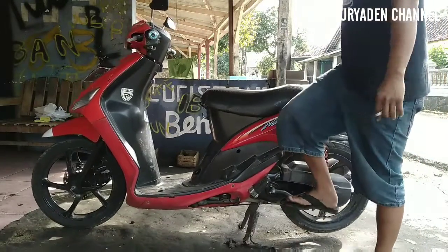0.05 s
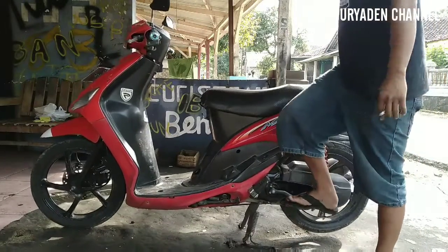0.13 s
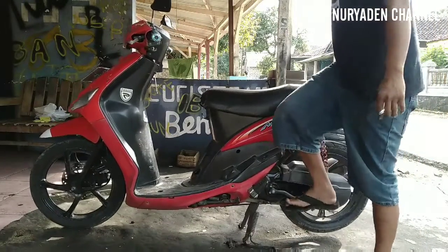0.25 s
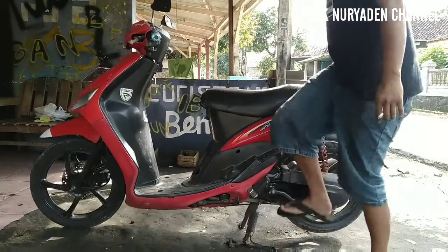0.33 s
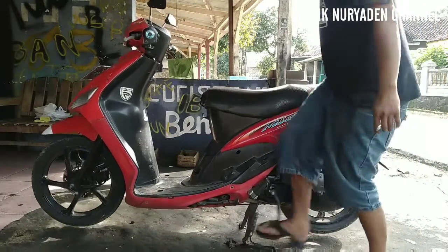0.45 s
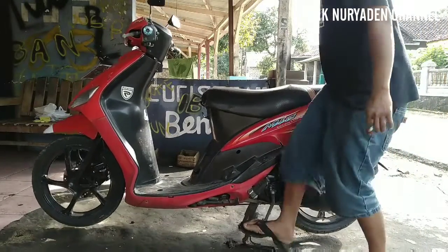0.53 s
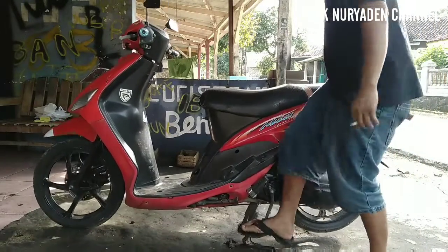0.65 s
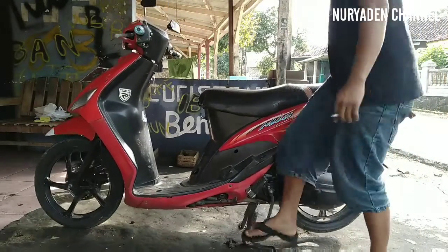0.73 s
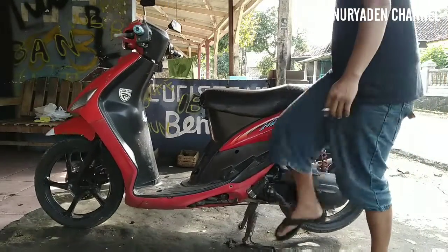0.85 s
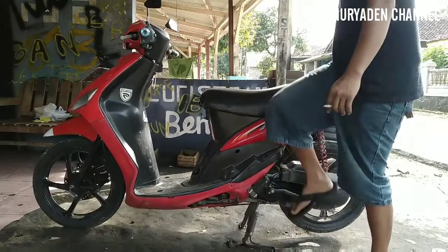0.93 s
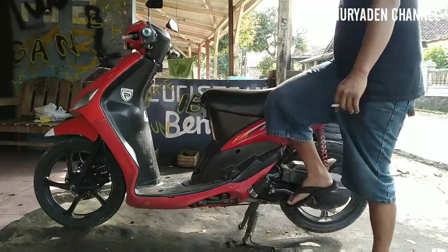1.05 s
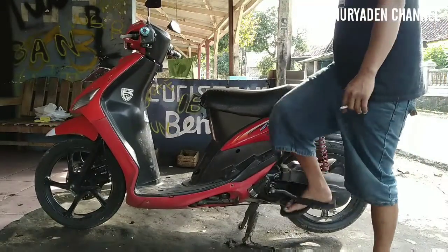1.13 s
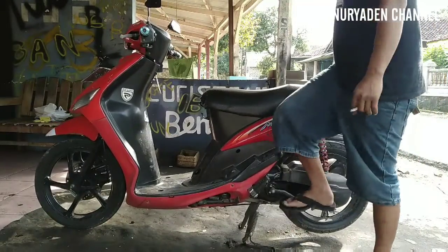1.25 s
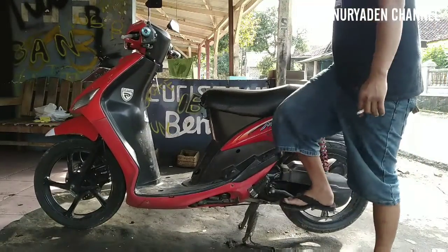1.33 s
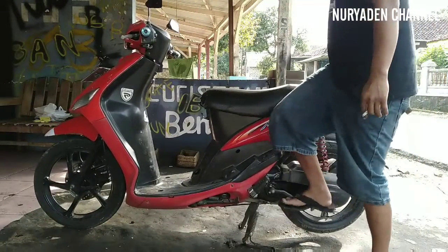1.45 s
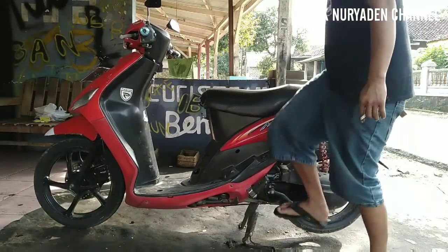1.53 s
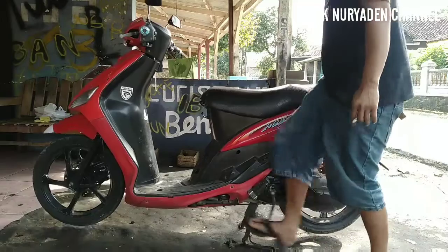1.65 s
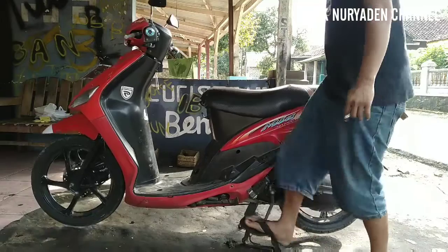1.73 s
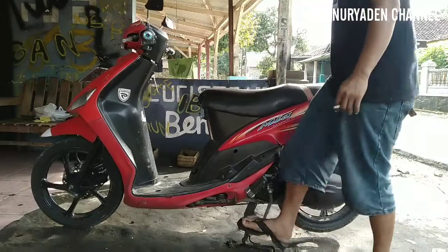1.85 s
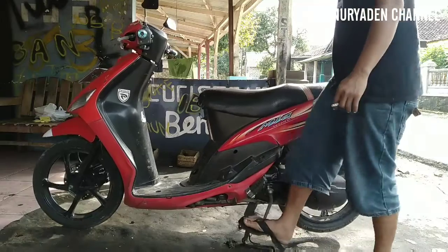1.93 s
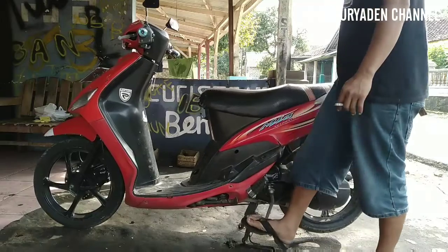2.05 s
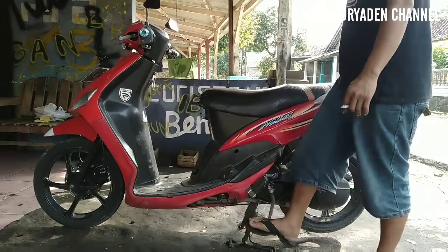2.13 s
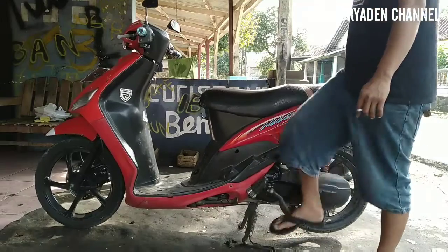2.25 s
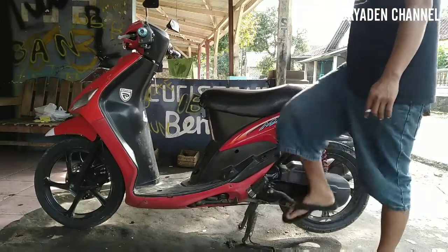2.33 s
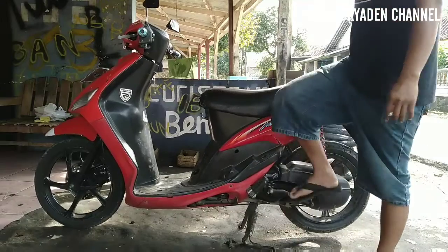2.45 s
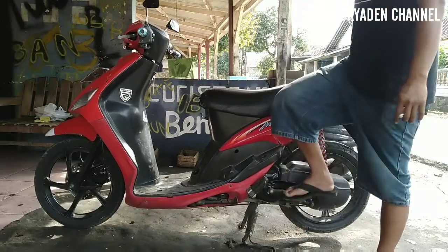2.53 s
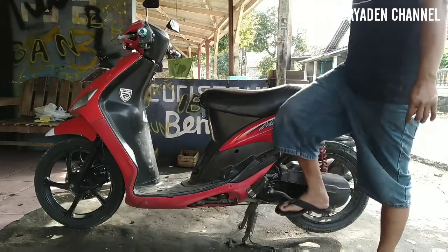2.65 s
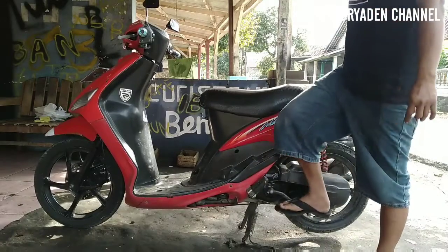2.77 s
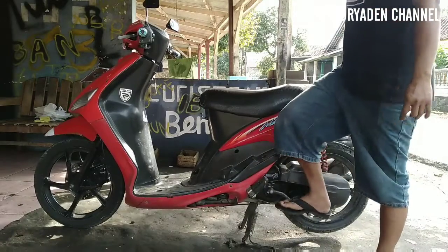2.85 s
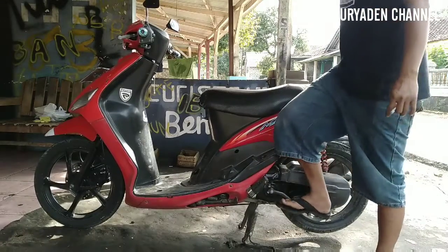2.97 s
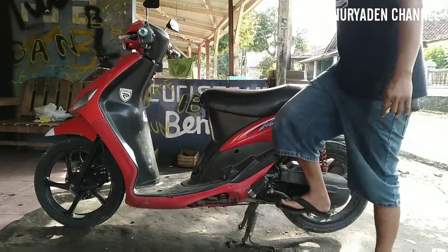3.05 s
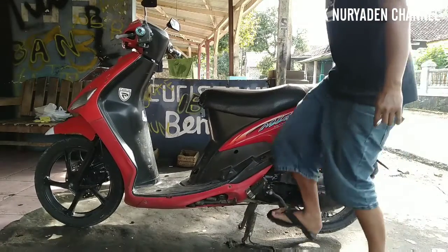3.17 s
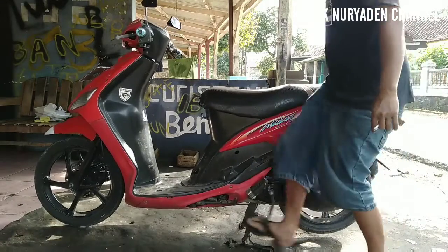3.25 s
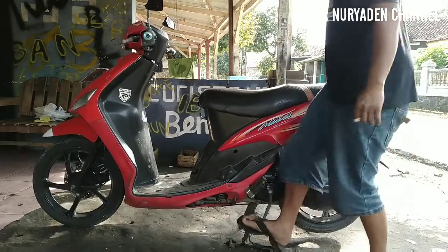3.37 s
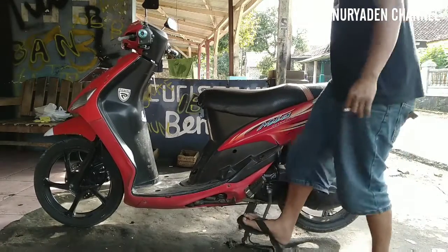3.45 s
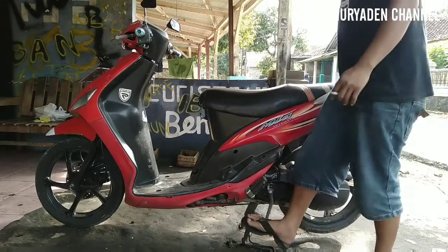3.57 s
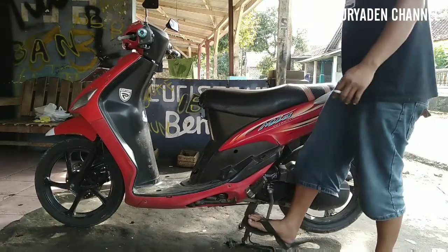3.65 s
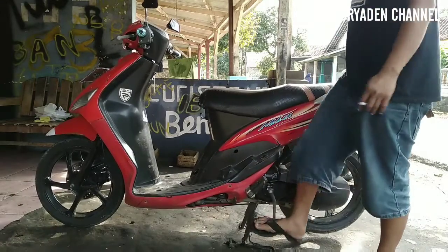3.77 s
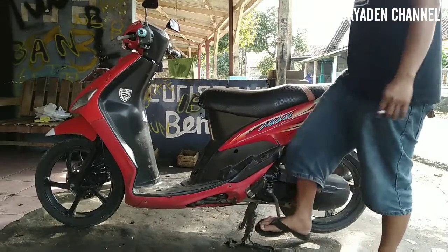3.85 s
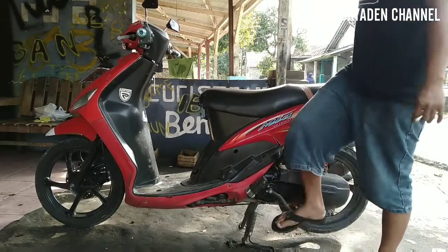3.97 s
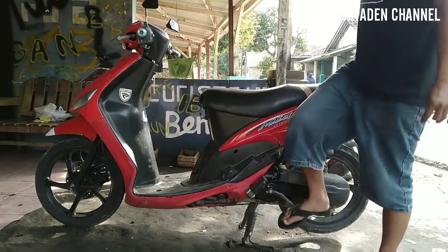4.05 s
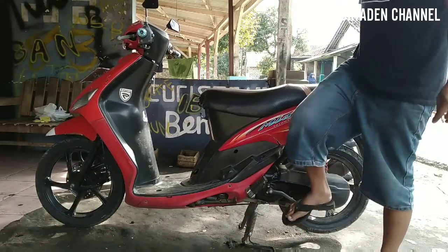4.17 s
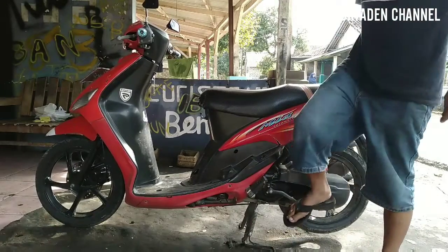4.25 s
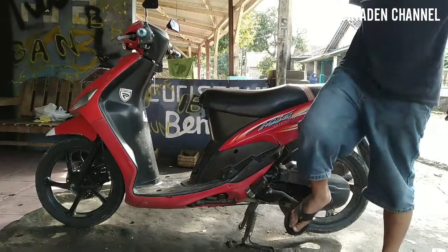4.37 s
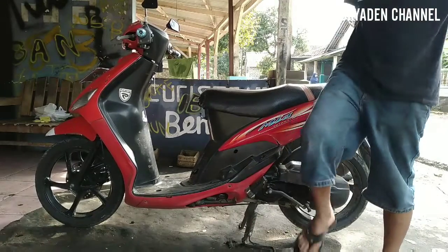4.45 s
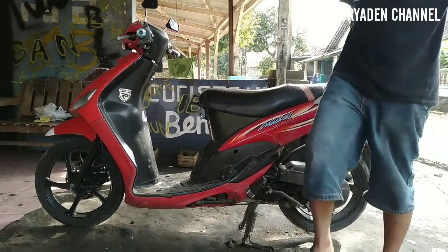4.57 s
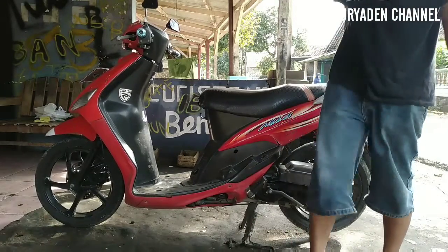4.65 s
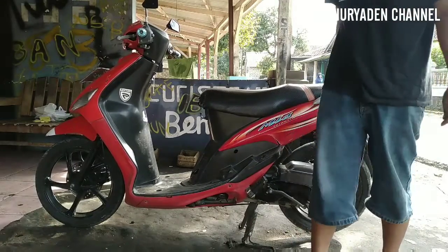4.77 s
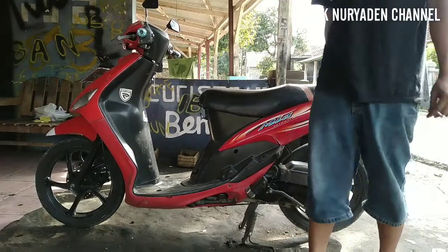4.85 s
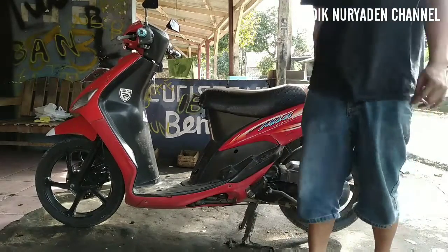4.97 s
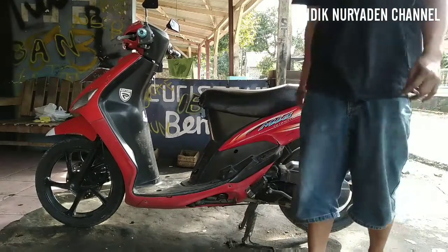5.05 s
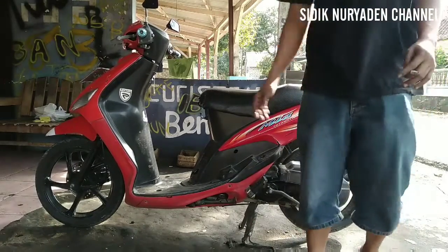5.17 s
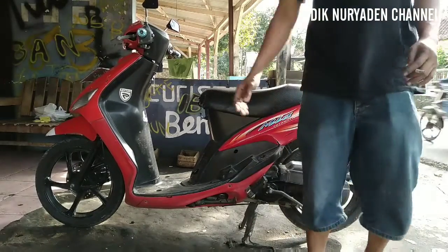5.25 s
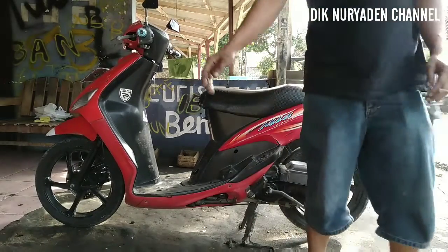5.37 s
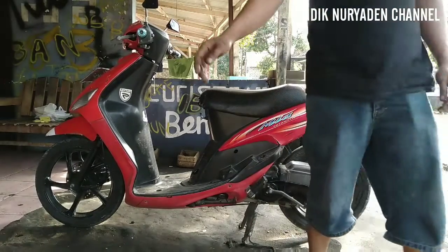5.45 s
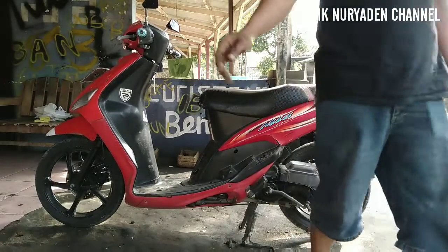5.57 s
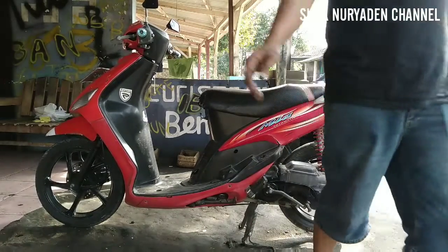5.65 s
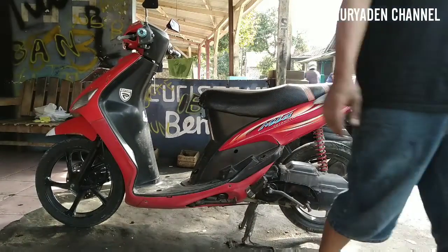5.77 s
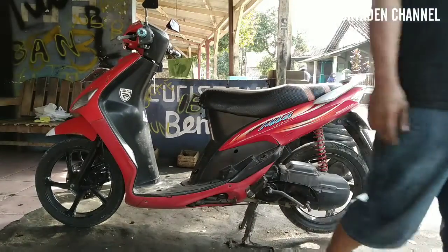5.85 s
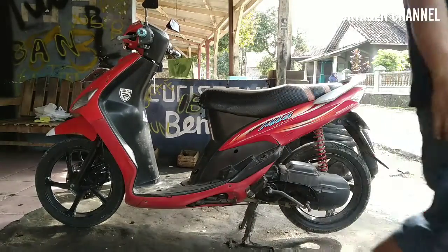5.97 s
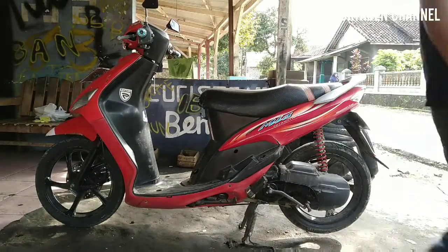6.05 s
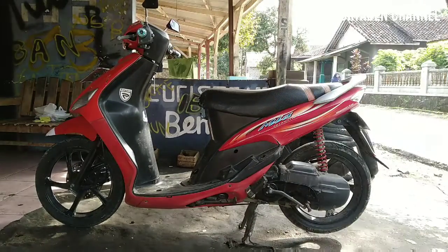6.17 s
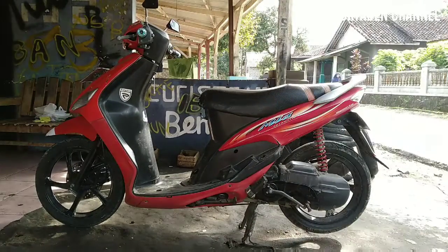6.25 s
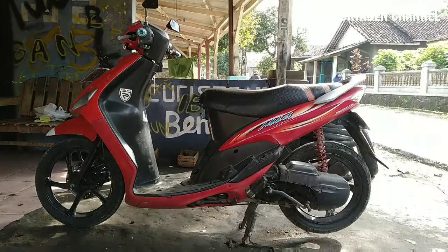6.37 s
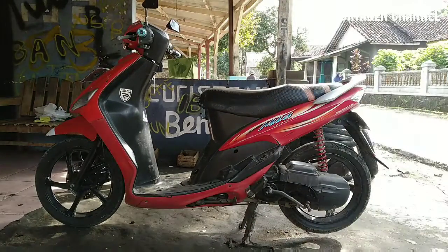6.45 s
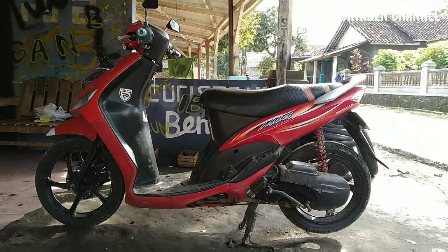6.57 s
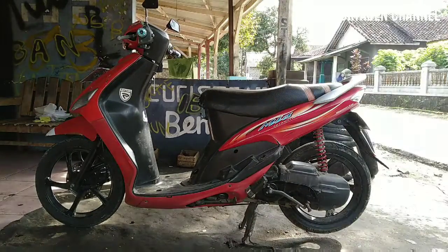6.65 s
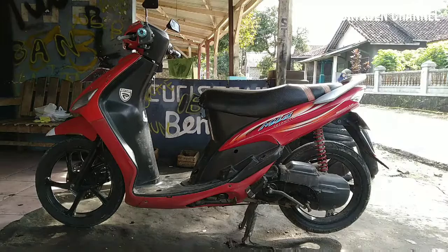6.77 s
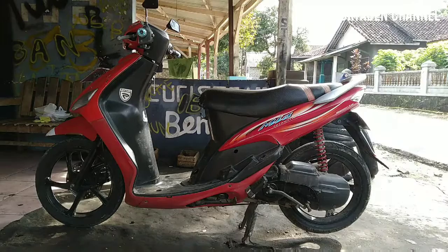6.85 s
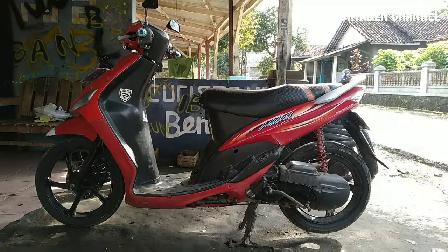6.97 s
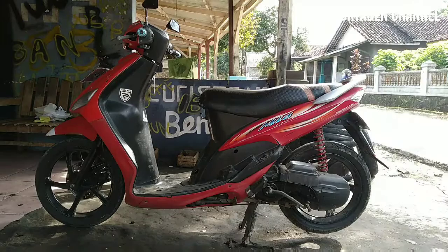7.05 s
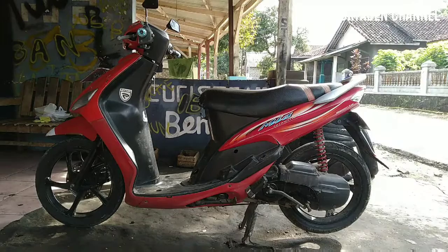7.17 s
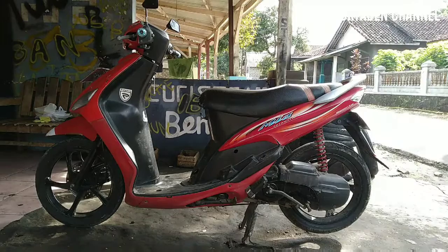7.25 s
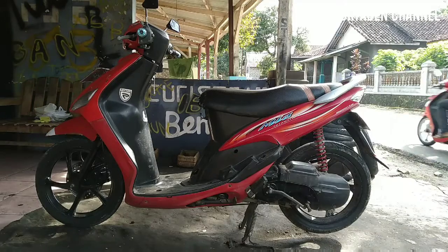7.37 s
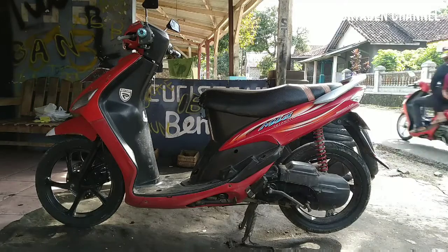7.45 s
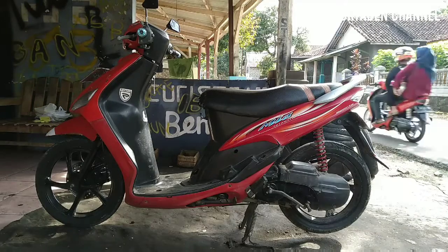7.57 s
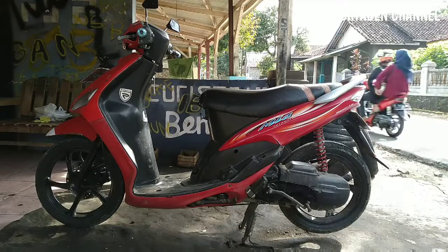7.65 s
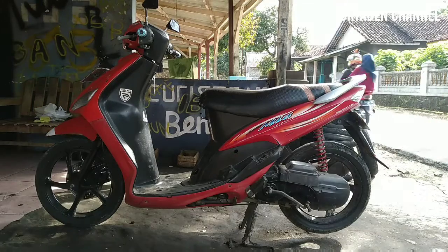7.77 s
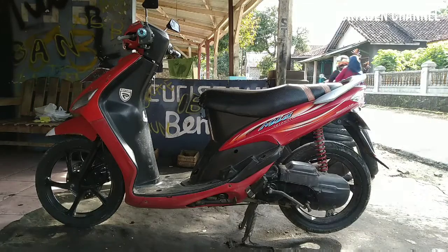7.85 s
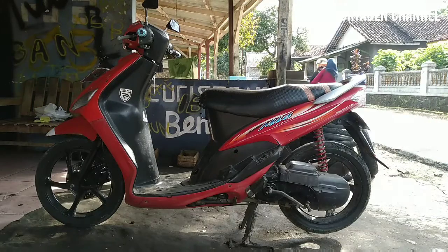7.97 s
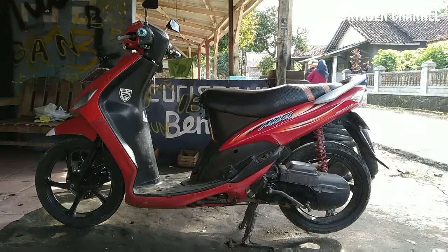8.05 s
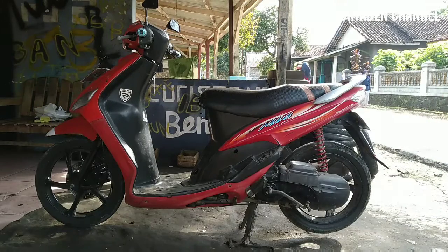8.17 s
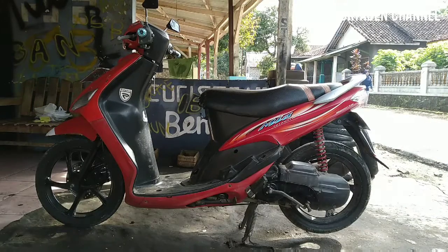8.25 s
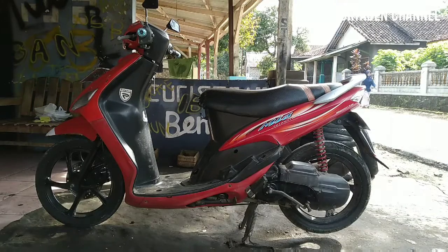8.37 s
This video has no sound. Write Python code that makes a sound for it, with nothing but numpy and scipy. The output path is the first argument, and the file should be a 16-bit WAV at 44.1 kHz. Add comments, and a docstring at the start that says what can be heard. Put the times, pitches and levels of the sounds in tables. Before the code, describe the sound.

Close, dry metallic clacks lead: a kick lever hits its stop three times, with crank scraping, loose teeth rattling on the return and a brief roof ring. Behind is a soft bed of distant traffic and leaves and a departing bike. Afterwards two small motorbikes swell past in turn, with tyre roar and hiss, while wind thumps a stereo phone microphone.

```python
"""On the road behind a workshop yard one motorbike leaves; under the roof a scooter's kick-starter is stamped down
at about 0.5, 1.7 and 3.3 s: the crank whirrs, the lever clacks on its stop and springs back over loose gear teeth.
Two single-cylinder bikes then pass near 4.8 and 7 s, built from tones locked to their firing plus shaped noise.
From 4.8 s on, stronger gusts buffet a phone's two microphone ports, each with its own treble resonance."""
import sys
import numpy as np
from scipy import signal
from scipy.fft import rfft, irfft, next_fast_len
from scipy.io import wavfile
from scipy.ndimage import uniform_filter1d, map_coordinates

SR = 44100
rng = np.random.default_rng(int(sys.argv[2]) if len(sys.argv) > 2 else 0)


def wav_record(signal):
    """Record a signal, one row per channel, as 16-bit PCM in the file named by sys.argv[1]."""
    frames = np.transpose(np.atleast_2d(signal))
    bounded = np.clip(frames, -1, 1)
    # unit amplitude maps onto the largest positive 16-bit level
    quanta = np.round(bounded * 32767).astype(np.int16)
    wavfile.write(sys.argv[1], SR, quanta)


N = 370515

# Far traffic and leaves: spectrum. Each row: frequency in Hz, relative density in dB per Hz.
YARD_SPECTRUM = [(15, -40), (25, 0), (60, -5.5), (140, -1.5), (250, -11), (460, -24), (700, -31.5),
                 (1290, -36.5), (5400, -33.5), (7300, -37.5), (8800, -37), (10700, -42), (16000, -55)]
# Width of the yard bed. Each row: frequency in Hz, left-right likeness from 0 to 1.
YARD_LIKENESS = [(60, 0.9), (130, 1), (300, 1), (640, 1), (1400, 0.56), (3000, 0), (15000, 0)]

# Exhaust loudness of each bike. Each row: time in seconds, level in dB.
LEAVING_LEVEL = [(0, -41.5), (.55, -42.5), (.75, -44.5), (1.3, -52), (1.7, -54), (2.5, -82)]
FIRST_LEVEL = [(0, -65), (.7, -68), (1.2, -54), (1.8, -49), (3.2, -49.5), (3.6, -41), (4.2, -38),
               (4.5, -32.5), (4.8, -35), (5.7, -35), (6.3, -40.5), (6.6, -49), (7, -41), (7.5, -60),
               (8.4, -47)]
SECOND_LEVEL = [(0, -56.5), (2.3, -53.5), (3.5, -49), (4.3, -44), (5.5, -43.5), (5.9, -42), (6.3, -36.5),
                (7.1, -34), (7.35, -34.5), (7.5, -37), (7.9, -38), (8.15, -41), (8.4, -43)]
# Firing rates; the first bike speeds up and changes gear. Each row: time in seconds, firings per second.
LEAVING_FIRING = [(0, 34.5), (1.5, 35.3), (2, 35.1)]
FIRST_FIRING = [(0, 23.3), (1.4, 25.8), (2.2, 26.5), (2.6, 22.8), (3, 27), (3.3, 26), (4.5, 26.75),
                (4.8, 26.7), (5.4, 26.15), (5.7, 26.05), (6.6, 26.5)]
SECOND_FIRING = [(0, 40.8), (1.5, 40.9), (4.3, 41.35), (5.5, 41.25), (6.7, 40.8), (7.1, 40.05), (7.5, 39.5),
                 (7.9, 39.25), (8.4, 39.1)]
# Exhaust tones. Each row: multiple of the firing rate, relative level in dB.
LEAVING_TONES = [(1, -11), (2, -8), (3, -14), (4, -16), (5, 0), (6, -14), (7, -16), (8, -18), (9, -17),
                 (10, -15), (11, -18), (12, -15)]
FIRST_TONES = [(1, -28), (2, -18), (3, -23), (4, -10), (5, 3), (6, 0), (7, -11), (8, -23), (9, -15.5),
               (10, -11), (11, -10.5), (12, -16.5), (13, -34.5), (15, -36)]
SECOND_TONES = [(1, -10), (2, 3), (3, -6), (4, 0), (5, 0), (6, -8), (7, -18), (8, -21), (9, -14), (10, -12),
                (11, -12), (12, -11), (13, -13), (14, -21), (15, -24), (16, -23), (17, -25), (18, -25),
                (20, -22), (21, -24), (23, -25)]

# Road noise of each bike. Each row: closest moment in seconds, approach and departure time scales in seconds,
# rumble level in dB, tyre roar level in dB.
PASSES = [(0, .8, 0.89, -52.5, -56.5), (4.8, 0.39, 0.42, -45, -42), (7, 0.39, 0.45, -37, -36.5)]
# Fall of rumble and of roar with distance: one exponent each, 1 = spherical spreading.
DISTANCE_FALL = [1.05, 1.06]
# Noise colours of rumble, tyre roar and hiss. Each row: frequency in Hz, relative density in dB per Hz.
RUMBLE_SPECTRUM = [(120, -28), (220, -1), (320, -1), (450, -1.5), (600, -12.5), (800, -5.5), (1300, -37)]
ROAR_SPECTRUM = [(240, -64), (400, -12), (681, -7.5), (1040, -6.5), (1110, -6), (1590, -9), (2070, -14),
                 (2370, -14.5), (3520, -16), (4180, -19), (6000, -21), (7800, -45), (13200, -120)]
HISS_SPECTRUM = [(1500, -5.5), (3000, -5), (5000, -6), (7000, -4), (9000, -11), (11000, -10), (13000, -13),
                 (16000, -13.5)]
# Width of the road noises. Each row: frequency in Hz, left-right likeness from 0 to 1.
ROAD_LIKENESS = [(60, 1), (200, 1), (500, 0.75), (2000, 0.17), (8000, 0.06), (15000, 0.17)]
# Valve and chain hiss, cut off now and then by what stands along the road. Each row: time in seconds, level in dB.
HISS_LEVEL = [(0, -49.5), (.4, -53.5), (1.3, -58.5), (2.1, -56.5), (2.5, -72), (3.1, -59), (3.9, -49.5),
              (4.4, -42), (4.94, -38), (5.45, -46.5), (5.8, -50), (6.36, -47), (6.74, -42), (6.95, -45.5),
              (7.3, -44), (7.67, -48), (8.12, -57), (8.4, -63)]
# Second bike's valve gear. Each row: time in seconds, level in dB.
RASP_LEVEL = [(5.6, -62), (6.3, -46), (6.65, -38.5), (6.9, -42), (6.97, -65), (7.15, -44.5), (7.4, -44),
              (8.2, -61)]
# Resonances of the valve gear, applied twice over. Each row: frequency in Hz, width and level in dB of one pass
# (the width in Hz).
VALVE_MODES = [(1640, 220, 0), (2450, 420, -1), (4250, 550, -1)]
# Thin whines from the passing bikes, one list per whine. Each row: time in seconds, pitch in Hz, level in dB.
WHINES = [
    [(3.6, 1250, -115), (3.9, 1230, -59), (4.2, 1204, -43.5), (4.5, 1240, -82)],
    [(6.8, 1038, -136), (7.3, 1021, -42), (7.7, 1018, -50.5), (8.4, 1012, -57)],
    [(5.6, 10800, -88), (6.2, 10850, -70), (7.2, 10400, -65.5), (8, 10480, -65.5), (8.4, 10300, -76)],
]
# Blur of each whine: one rate each, in random knots per second (roughly the band's width in Hz).
WHINE_BLUR = [25, 25, 350]

# Gusts on the ports. Each row: time in seconds, buffeting level in dB.
GUSTS = [(0, -69), (2, -52), (4, -54), (4.8, -26), (5.5, -37.5), (7.4, -40), (7.6, -22.5), (7.8, -32),
         (7.9, -32.5), (8.4, -34)]
# Colour of the buffeting. Each row: frequency in Hz, relative density in dB per Hz.
BUFFET_SPECTRUM = [(15, 10.5), (40, -4), (100, -2.5), (200, -4), (400, -43), (800, -44)]
# Single pressure pops. Each row: time in seconds, peak in dB, push (1) or pull (-1), pitch in Hz.
POPS = [(2.62, -32, 1, 39.5), (4.75, -36, 1, 50), (7.202, -22, 1, 70), (7.6, -28, -1, 60),
        (7.693, -17, 1, 120), (7.718, -17, -1, 190), (7.841, -10, 1, 159), (7.895, -24, 1, 60),
        (8.163, -22, 1, 200), (8.175, -15.5, -1, 85)]

# Lever contacts. Each row: time in seconds, level in dB, brightness in dB per octave, ringing after the blow in dB.
CLACKS = [(0.371, -49, 3.5, -6.5), (0.5343, -15, 0.5, -12.5), (0.7566, -35, .6, -4.5), (1.157, -49, 7, -7),
          (1.1813, -40, 4, -9.5), (1.295, -54, -2.2, -3), (1.518, -53.5, 7, -14), (1.731, -18, 0.3, -10.5),
          (1.8146, -35.5, -.6, -13), (2.2378, -55.5, 2.2, -1), (2.2582, -53, 1, -9), (2.366, -55, 3, -12),
          (2.384, -54, 2, -12), (2.4198, -53, 1.5, -12), (2.651, -47, 10.5, -11), (2.6603, -52.5, -1, -6),
          (2.7104, -42.5, 2, -12), (3.317, -15, 1, -13), (3.5602, -33.5, .1, -4.5)]
# Engine casing resonances. Each row: frequency in Hz, width in Hz, level in dB.
CASING_MODES = [(480, 180, -2.5), (820, 73, -4.5), (1150, 560, -9), (1525, 390, 2.5), (1980, 170, 4.5),
                (2530, 460, 2), (3720, 1200, -2), (4510, 1000, -2.5), (5800, 1010, -6), (7100, 1090, -7),
                (10500, 3300, -14.5), (14500, 6200, -18)]
# Kicks. Each row: push, stop and spring-back times in seconds, spring-back length in seconds,
# stroke, spring-back and engine rumble levels in dB.
KICKS = [(0.469, 0.54, 0.78, 0.046, -42, -37, -49), (1.63, 1.708, 1.815, 0.068, -47.5, -37.5, -44.5),
         (3.243, 3.328, 3.56, 0.058, -44.5, -38, -43.5)]
# Gearbox ringing. Each row: frequency in Hz, time to fall 60 dB in seconds.
GEARBOX_MODES = [(815, 0.13), (1005, 0.095), (1190, 0.037), (1450, 0.032), (1850, 0.03), (2050, 0.053),
                 (2240, 0.037), (2510, .03), (4050, .02)]
# Loudest knocks of loose gear teeth. Each row: time in seconds, level in dB, best-struck pitch in Hz.
RATTLES = [(.733, -34, 2500), (.757, -21.5, 2230), (.766, -29, 816), (.783, -35, 815), (.797, -32, 1015),
           (.81, -29, 1240), (1.296, -38, 2500), (1.632, -42, 1000), (1.694, -36, 1890), (1.736, -32, 1160),
           (1.821, -32, 995), (1.85, -34, 805), (1.868, -25, 2050), (1.877, -28, 2210), (2.352, -42, 4100),
           (2.403, -38, 4000), (3.244, -28, 1300), (3.323, -19.5, 1150), (3.368, -29, 1450),
           (3.565, -26, 2000), (3.575, -32, 823), (3.613, -26, 2280)]
# Low puffs of the piston and thuds of the stand. Each row: time in seconds, level in dB, pitch in Hz, length in seconds.
THUDS = [(0.54, -36, 61, 0.037), (.532, -33, 357, 0.0089), (3.314, -35, 360, 0.015), (1.6, -43, 370, 0.013),
         (1.691, -31, 50, 0.03), (3.288, -30, 59, 0.048), (3.4, -31, 320, 0.05)]

# Treble resonances of the microphone ports. Each row: frequency in Hz, width in Hz, level in dB.
LEFT_PORT = [(4300, 810, -10), (7360, 1290, 13)]
RIGHT_PORT = [(10590, 1720, 10.5)]

TURN_S = 0.15  # how quickly a tail pipe swings past
RATTLE_S, ATTACK_S = 0.006, 0.00083  # a lever contact's rattle and onset
RING_T60_S, ROOF_T60_S, ROOF_DB = 0.145, 0.35, 0.7  # ring-down of casing and roof; roof over casing
BITE_S, BITE_DB = 0.041, -7  # a stroke swells in over BITE_S, to this level relative to its peak at the stop
COAST_DB_PER_S = 147  # run-down after the stop
BACK_START_DB, BACK_DB_PER_S = -2, 209  # spring-back: start relative to its end, and the drop afterwards
SETTLE_DB, SETTLE_S, QUIET_S = -17.5, 0.27, 0.98  # faint whirr: relative level, end of hold, died away
TURNOVER_S = 0.12  # the engine rumbles around this long after the stop
STROKE_DULL, BACK_DULL = 1, 0.55  # power share of dull scrape; the rest is casing ring
OFF_MODE_DB_PER_OCT = 62  # how fast modes weaken away from the one struck best
CHATTER_DB, STROKE_GRIT_DB = -5, 5.5  # least level of small knocks over the crank; the loaded ratchet adds grit
TOP_HZ = 15900  # upper band limit
SIDES = np.array([[1], [-1]])  # opposite signs for left and right


def amp(db):
    """Gain of a level in dB."""
    return 10 ** (np.asarray(db) / 20)


def unit(x):
    """Scaled to rms 1."""
    return x / np.sqrt(np.mean(x ** 2) + 1e-20)


def along(points, hz):
    """Values between (Hz, value) points on a log axis."""
    f, v = np.transpose(points)
    return np.interp(np.log(hz + 1), np.log(f + 1), v)


def curves(rows):
    """One value per sample for each column after the time."""
    s, *cols = np.transpose(rows)
    return [np.interp(np.arange(N) / SR, s, c) for c in cols]


def wobble(rate):
    """A random curve of straight lines between knots, rate knots a second."""
    knots = rng.standard_normal(int(N * rate / SR) + 4)
    return map_coordinates(knots, [np.arange(N) * rate / SR], order=1)


def filtered(x, response):
    """x shaped by a complex response of frequency."""
    m = next_fast_len(x.shape[-1] + 8192)
    spectrum = rfft(x, m) * response(np.fft.rfftfreq(m, 1 / SR))
    return irfft(spectrum, m)[..., :x.shape[-1]]


def resonances(modes, hz):
    """Causal response of (Hz, width, dB) modes summed with alternating sign."""
    total = 0
    for k, (centre, width, db) in enumerate(modes):
        damping = 1j * hz * width
        total = total + (-1) ** k * amp(db) * damping / (centre * centre - hz * hz + damping)
    return total


def pair(alike, size):
    """White noise on two channels with the given likeness."""
    a, b = rng.standard_normal((2, size))
    turn = np.arccos(np.clip(alike, -1, 1)) / 2
    return np.cos(turn) * a + np.sin(turn) * b * SIDES


def rush(spectrum, alike, patchy_db):
    """Coloured stereo noise of rms 1, its gain patchy over time and pitch."""
    z = signal.stft(rng.standard_normal((2, N)), nperseg=512)[2]
    patches = uniform_filter1d(rng.standard_normal(z.shape[1:]), size=3, axis=0)
    patches = uniform_filter1d(patches, size=10, axis=1)
    noise = signal.istft(z * amp(patchy_db * unit(patches)), nperseg=512)[1][:, :N]

    def colour_and_width(hz):
        turn = np.arccos(np.clip(along(alike, hz), -1, 1)) / 2
        return amp(along(spectrum, hz)) * [np.cos(turn), np.sin(turn)]

    mid, side = filtered(noise, colour_and_width)
    return unit(np.array([mid + side, mid - side]))


def yard():
    """Distant traffic and leaves as a steady bed of coloured noise."""
    return amp(-45.5) * rush(YARD_SPECTRUM, YARD_LIKENESS, patchy_db=1.0)


def exhaust(firing, level, tones, turn_at_s, boom_gain_db, bright_at_s, dulling_db_per_s,
            unsteady, scatter_db, spread):
    """Exhaust tones locked to the firing cycle; returns the sound and the cycle count."""
    t = np.arange(N) / SR
    db, = curves(level)
    boom_db = boom_gain_db * np.tanh((t - turn_at_s) / TURN_S) / 2  # the tail pipe turns this way
    edge_db = -dulling_db_per_s * np.abs(t - bright_at_s)
    cycles = np.cumsum(curves(firing)[0]) / SR + unsteady * wobble(14)
    sound = np.zeros((2, N))
    for k, tone_db in tones:
        scatter = scatter_db * min(1, .4 + k / 10) * wobble(7)
        strength = amp(tone_db + boom_db * (k < 5) + edge_db * (k > 6) + scatter)
        # echoes shift each tone, a little differently at each port
        drift = 0.049 * k * wobble(3) * SIDES + 0.19 * np.sqrt(k) * wobble(5)
        # higher tones leave the pipe later
        sound += strength * np.cos(2 * np.pi * k * cycles - spread * k * k + drift)
    return np.sqrt(2) * amp(db + .8 * wobble(25)) * sound, cycles


def road_noise():
    """Rumble and tyre roar; each bike's share fades with its distance from the closest point."""
    power = np.zeros((len(DISTANCE_FALL), N))
    for s, come, go, *levels_db in PASSES:
        since = np.arange(N) / SR - s
        distance_squared = 1 + (since / np.where(since < 0, come, go)) ** 2
        power += [amp(2 * db) * distance_squared ** -fall for db, fall in zip(levels_db, DISTANCE_FALL)]
    rumble, roar = np.sqrt(power)
    sound = rumble * rush(RUMBLE_SPECTRUM, ROAD_LIKENESS, patchy_db=1.0)
    return sound + roar * rush(ROAR_SPECTRUM, ROAD_LIKENESS, patchy_db=1.5)


def chain_hiss(cycles):
    """Valve and chain hiss, pulsing slightly with the first bike's firing."""
    beat = 1 + 0.073 * np.cos(2 * np.pi * cycles)
    return amp(curves(HISS_LEVEL)[0]) * beat * rush(HISS_SPECTRUM, ROAD_LIKENESS, patchy_db=2.5)


def whine(rows, blur):
    """A gliding tone smeared into a narrow band of noise."""
    hz, db = curves(rows)
    phase = 2 * np.pi * np.cumsum(hz) / SR
    return amp(db) * ((1 + wobble(blur)) * np.sin(phase) + wobble(blur) * np.cos(phase))


def valve_rasp(cycles):
    """Noise through the valve-gear resonances, swelling with every firing."""
    beat = amp(2.7 * wobble(60)) * (1.8 + np.cos(np.pi * cycles) ** 4)
    rasp = filtered(beat * pair(0.33, size=N), lambda hz: resonances(VALVE_MODES, hz) ** 2)
    return amp(curves(RASP_LEVEL)[0]) * unit(rasp)


def road():
    """All bikes and their noise; the left port is nearer the road and hears all but the bass first."""
    leaving, _ = exhaust(LEAVING_FIRING, LEAVING_LEVEL, LEAVING_TONES, turn_at_s=0.2, boom_gain_db=-5,
                         bright_at_s=1, dulling_db_per_s=1.9, unsteady=0.022, scatter_db=6, spread=0.115)
    first, first_cycles = exhaust(FIRST_FIRING, FIRST_LEVEL, FIRST_TONES, turn_at_s=4.73, boom_gain_db=14,
                                  bright_at_s=4.95, dulling_db_per_s=4.7,
                                  unsteady=.006, scatter_db=2.6, spread=.12)
    second, second_cycles = exhaust(SECOND_FIRING, SECOND_LEVEL, SECOND_TONES, turn_at_s=7, boom_gain_db=-2.5,
                                    bright_at_s=4, dulling_db_per_s=0.7,
                                    unsteady=.004, scatter_db=2.6, spread=.11)
    sound = leaving + first + second + road_noise() + chain_hiss(first_cycles) + valve_rasp(second_cycles)
    sound += sum(whine(rows, blur) for rows, blur in zip(WHINES, WHINE_BLUR))

    def port_lead(hz):
        lead_s = 0.000375 * hz ** 2 / (hz ** 2 + 400 ** 2)  # left over right
        return np.exp(1j * np.pi * hz * lead_s * SIDES)

    return filtered(sound, port_lead)


def wind():
    """Lumpy buffeting, unrelated at the two ports, with single pressure pops on the left one."""
    db, = curves(GUSTS)
    lumps = amp(4 * np.array([wobble(30), wobble(30)]))
    buffeting = unit(filtered(lumps * pair(0, size=N), lambda hz: amp(along(BUFFET_SPECTRUM, hz))))
    out = amp(db + .6 * SIDES) * buffeting
    for s, peak_db, sign, hz in POPS:
        u = np.pi * hz * (np.arange(N) / SR - s)
        out[0] += np.sign(sign) * amp(peak_db) * (1 - 2 * u * u) * np.exp(-np.minimum(u * u, 50))
    return out


def casing(x, tilt_db):
    """The engine casing's resonances, tilted about 3 kHz; it is too small to radiate bass."""
    def response(hz):
        tilt = amp(tilt_db * np.log2((hz + 100) / 3000))
        bass_loss = (1j * hz / (500 + 1j * hz)) ** 2
        return resonances(CASING_MODES, hz) * tilt * bass_loss

    return filtered(x, response)


def clacks():
    """Each lever contact rattles for a few ms, then the casing and the roof ring down."""
    out, t = np.zeros((2, N + SR)), np.arange(SR // 2) / SR
    onset = 1 - np.exp(-(t / ATTACK_S) ** 2)
    blow = 1 / (1 + (t / RATTLE_S) ** 6)
    ring = amp(-60 * t / RING_T60_S) + amp(ROOF_DB - 60 * t / ROOF_T60_S)
    for s, db, tilt_db, ring_db in CLACKS:
        steel = unit(casing(pair(0.13, size=len(t)), tilt_db))
        start = round(s * SR) - 40  # a little early, for the soft onset
        out[:, start:start + len(t)] += amp(db) * onset * (blow + amp(ring_db) * ring) * steel
    return out[:, :N]


def effort():
    """Gains of the down strokes, the spring-backs and the engine's turning over."""
    t = np.arange(N) / SR
    stroke, spring, turning = np.zeros((3, N))
    for push, stop, back, length, stroke_db, back_db, rumble_db in KICKS:
        end = back + length
        stroke += amp(stroke_db + np.interp(t, [push - BITE_S, push, stop, stop + 1],
                                            [-40, BITE_DB, 0, -COAST_DB_PER_S]))
        swell_db = np.interp(t, [back - .004, back + 0.0056, end, end + 1],
                             [-60, BACK_START_DB, 0, -BACK_DB_PER_S])
        whirr_db = np.interp(t, [back, end, back + SETTLE_S, back + QUIET_S], [-60, SETTLE_DB, SETTLE_DB, -60])
        spring += amp(back_db) * (amp(swell_db) + amp(whirr_db))
        turning += amp(rumble_db) * np.exp(-((t - stop - TURNOVER_S / 2) / TURNOVER_S) ** 2)
    return stroke, spring, turning


def crank():
    """Gear teeth and the ratchet scrape the casing in uneven grains; the engine rumbles as it turns."""
    stroke, spring, turning = effort()
    grains = pair(.6, size=N) * amp(3.5 * wobble(400))
    scrape = unit(filtered(grains, lambda hz: resonances([(860, 2540, 0)], hz) ** 2))
    ringing = unit(casing(grains[:, ::-1], 0))  # reversed grains, so unrelated to the scrape

    def blend(dull):
        return np.sqrt(dull) * scrape + np.sqrt(1 - dull) * ringing

    rumble = turning * rush(RUMBLE_SPECTRUM, ROAD_LIKENESS, patchy_db=1.0)
    return stroke * blend(STROKE_DULL) + spring * blend(BACK_DULL) + rumble


def chatter():
    """Small knocks every 14 ms or so while the crank moves, as loud as its effort allows."""
    stroke, spring, _ = effort()
    busy = amp(STROKE_GRIT_DB) * stroke + spring
    knocks = []
    for push, _, back, *_ in KICKS:
        for s in np.arange(push, back + .15, .014):
            u, v = rng.random(2)  # u scatters the level, v both delay and pitch
            level_db = CHATTER_DB + 20 * np.log10(busy[round(s * SR)]) + 6 * u
            knocks.append((s + .01 * v, level_db, 800 * 3.2 ** v))
    return knocks


def rattles():
    """Each knock of loose teeth rings the gearbox modes near its pitch, a little unsteadily."""
    out, t = np.zeros(N + SR), np.arange(SR // 10) / SR
    hz, t60 = np.transpose(GEARBOX_MODES)[:, :, None]
    onset = 1 - np.exp(-t / 0.0031)
    for s, db, best_hz in RATTLES + chatter():
        wander = np.cumsum(rng.standard_normal(len(t))) * 0.07
        level_db = db - OFF_MODE_DB_PER_OCT * np.abs(np.log2(hz / best_hz)) - 60 * t / t60
        modes = amp(level_db) * np.sin(2 * np.pi * hz * t + wander)
        out[round(s * SR):][:len(t)] += onset * np.sum(modes, axis=0)
    return out[:N]


def thuds():
    """Short low swings with a soft start and end."""
    t, out = np.arange(N) / SR, np.zeros(N)
    for s, db, hz, length in THUDS:
        swell = np.sin(np.pi * np.clip((t - s) / length, 0, 1)) ** 2
        out += amp(db) * swell * np.sin(2 * np.pi * hz * (t - s))
    return out


def scene():
    """Scooter in front, road behind, wind on the phone."""
    return yard() + road() + wind() + clacks() + crank() + rattles() + thuds()


def record(dry):
    """Port resonances, soft clipping at full scale and the band limit."""
    def ports(hz):
        # the left port's two resonances add with the same sign
        left = 1 + resonances(LEFT_PORT[:1], hz) + resonances(LEFT_PORT[1:], hz)
        return np.array([left, 1 + resonances(RIGHT_PORT, hz)])

    x = filtered(dry, ports)
    x = x / (1 + np.abs(x) ** 8) ** (1 / 8)
    return filtered(x, lambda hz: hz < TOP_HZ)


dry = scene()
out = record(dry)
wav_record(out)
```